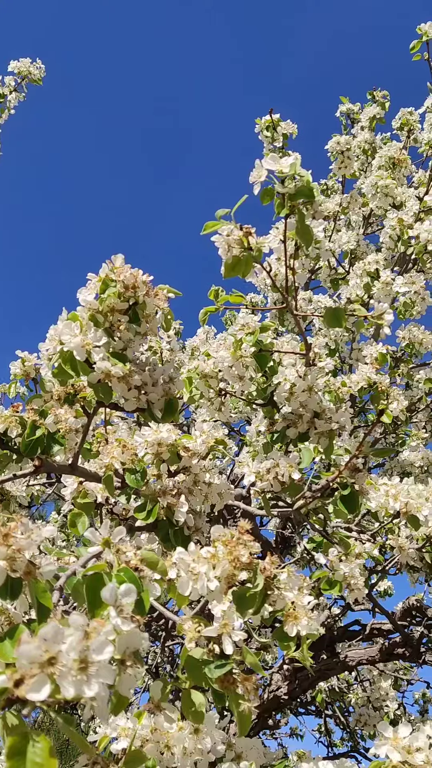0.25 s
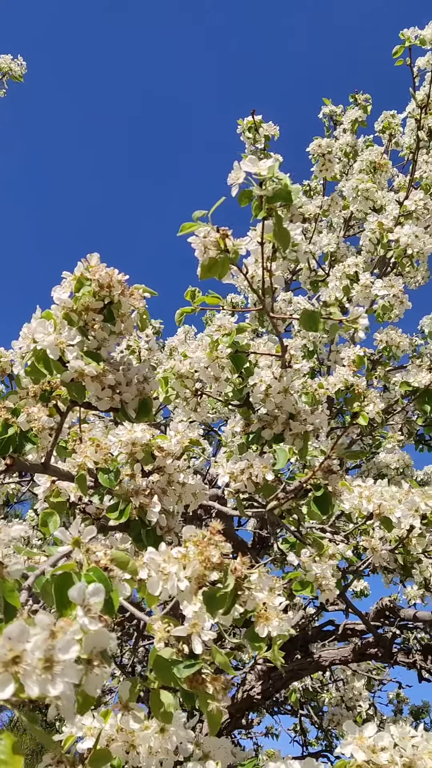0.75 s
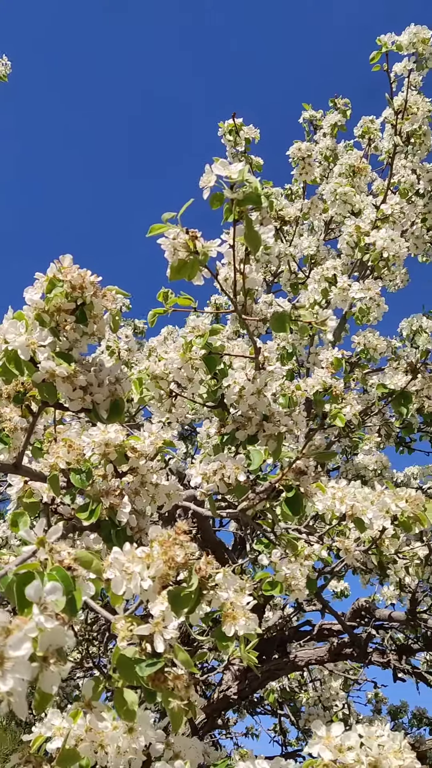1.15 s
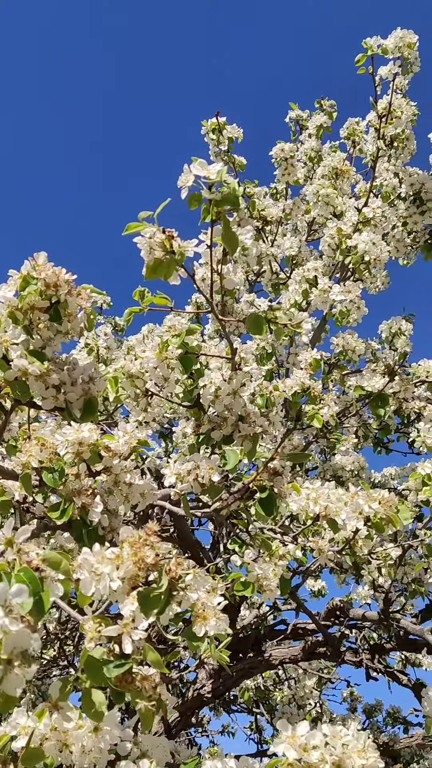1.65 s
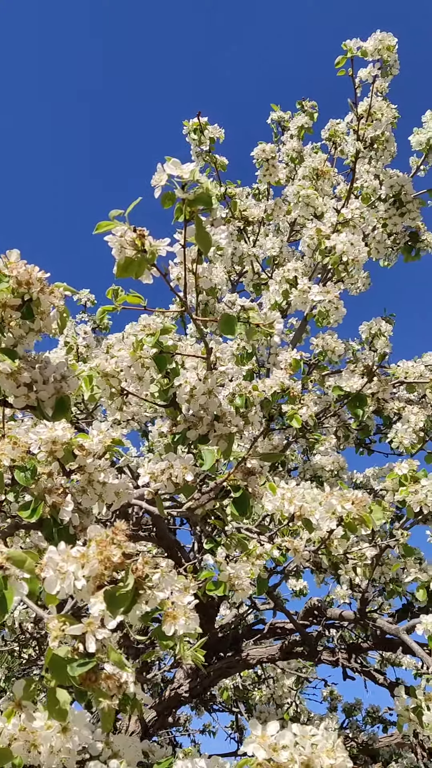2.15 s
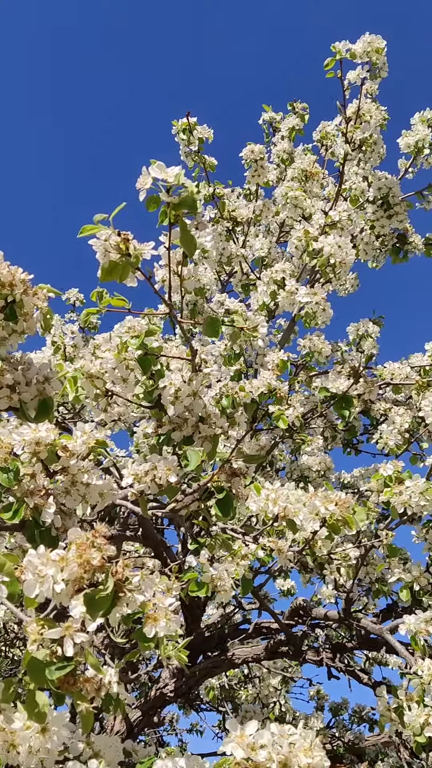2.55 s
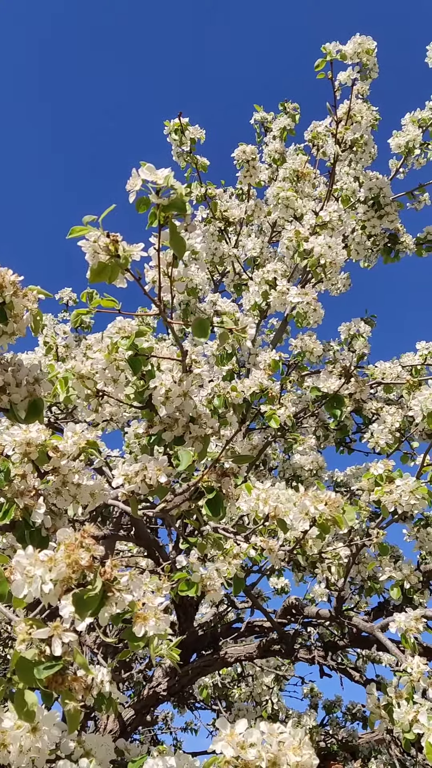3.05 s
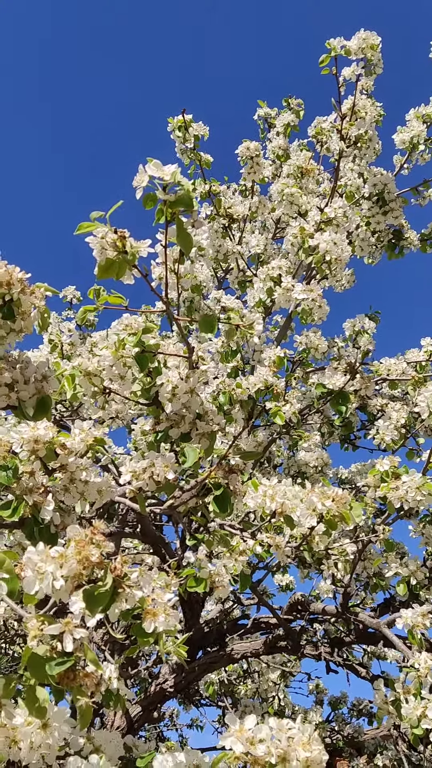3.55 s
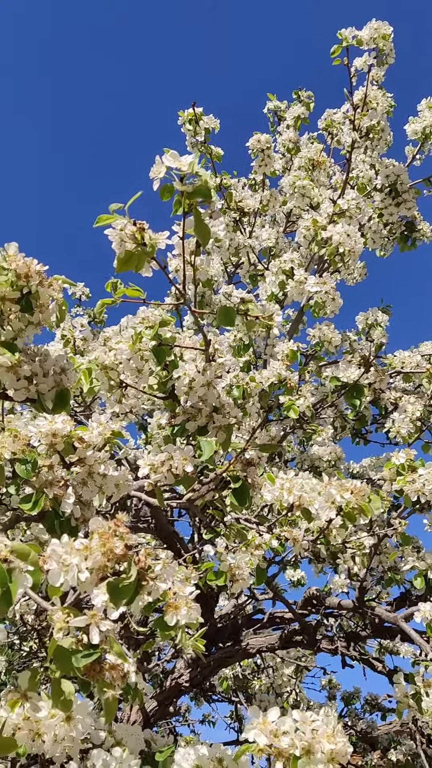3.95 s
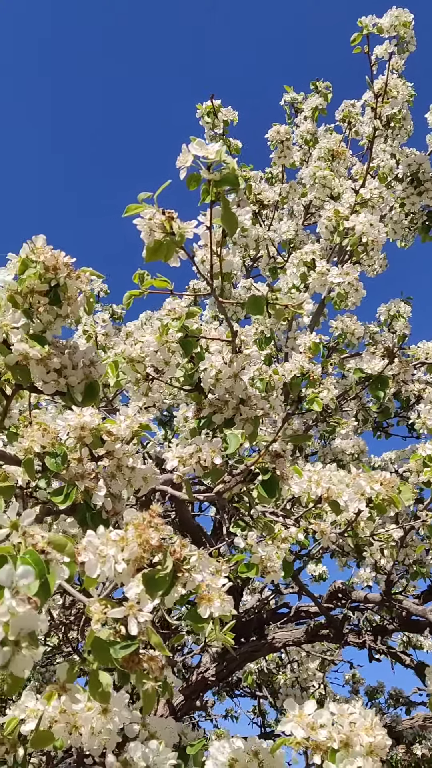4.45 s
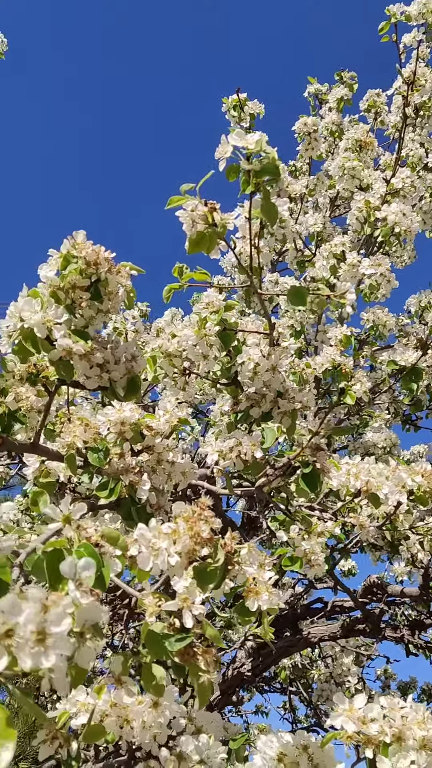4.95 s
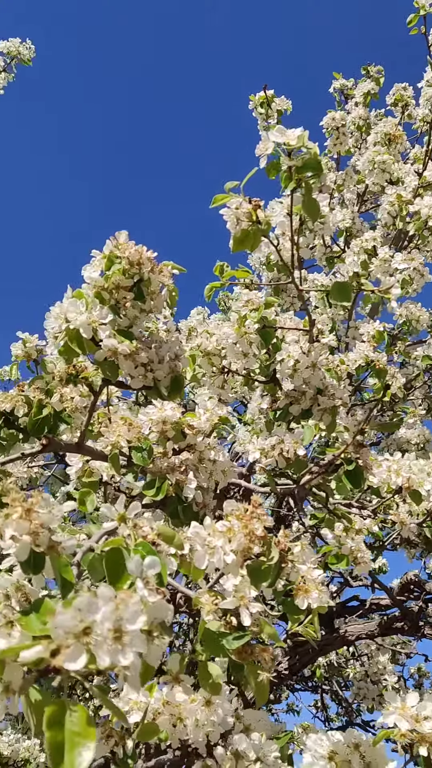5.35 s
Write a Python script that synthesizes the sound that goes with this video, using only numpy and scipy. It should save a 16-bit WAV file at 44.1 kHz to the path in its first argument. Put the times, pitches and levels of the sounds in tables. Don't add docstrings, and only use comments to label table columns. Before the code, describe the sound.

Outdoors by a flowering tree, many small birds sing at once: a loud low whistled run opens, a repeated dropping whistle follows until about two seconds, then sharp chips and falling swoops. A cockerel crows very faintly far off. Soft air, leaf rustle and low wind bumps lie beneath. Fingers tick on the handheld device. The left side is clear and strong, the right very faint and dull.

```python
import sys
import numpy as np
from scipy import signal
from scipy.fft import rfft, irfft
from scipy.io import wavfile
from scipy.ndimage import uniform_filter1d, minimum_filter1d

SR = 44100
rng = np.random.default_rng(int(sys.argv[2]) if len(sys.argv) > 2 else 0)


def decibels_to_gain(level_db):
    exponent = np.asarray(level_db, float) / 20
    return 10 ** exponent


def pcm_store(signal):
    levels = np.round(np.clip(np.atleast_2d(signal), -1, 1) * 32767)
    wavfile.write(sys.argv[1], SR, levels.astype(np.int16).T)


N = 246078


def in_time(rows):
    s, *columns = np.transpose(rows)
    return [np.interp(np.arange(N) / SR, s, column) for column in columns]


def rms_one(x):
    return x / np.sqrt(np.mean(x ** 2) + 1e-20)


def drift(rate):
    pole = np.exp(-40 * np.pi * rate / SR)
    chance = rng.standard_normal(N // 20 + 4002)
    slow = signal.lfilter([1], [1, -2 * pole, pole * pole], chance)[4000:]
    return np.interp(np.arange(N) / 20, np.arange(len(slow)), rms_one(slow))


def butter(x, hz, kind, order=2):
    return signal.sosfilt(signal.butter(order, hz, kind, fs=SR, output="sos"), x)


def coloured(spectrum, patchy_db):
    hz = np.fft.rfftfreq(N, 1 / SR) + 1
    points, level_db = np.transpose(spectrum)
    shape = decibels_to_gain(np.interp(np.log(hz), np.log(points), level_db, left=-60, right=-60))
    noise = rfft(rng.standard_normal(N)) * shape
    octave = np.log2(hz / 125)
    total = np.zeros(N)
    for k in range(8):
        band = irfft(noise * np.clip(1 - abs(octave - k), 0, 1), N)
        total += band * decibels_to_gain(patchy_db * drift(15.0))
    return rms_one(total)


def add(out, start, pitch_hz, height):
    at = round(start * SR)
    note = height * np.sin(2 * np.pi * np.cumsum(pitch_hz) / SR)
    out[at:at + len(note)] += note[:N - at]


def flutter(depth, rate):
    return 1 - np.clip(depth, 0, 1) * (1 + np.tanh(0.5 * drift(rate))) / 2


def singer(shape, times):
    out = np.zeros(N)
    s, hz, level_db = np.transpose(shape)
    waver = 1 + 0.00666 * drift(39)
    for start, stretch, ratio, peak_db in times:
        t = np.arange(0, s[-1] * stretch, 1 / SR) / stretch
        pitch = uniform_filter1d(np.interp(t, s, hz), size=100, mode="nearest")
        pitch = ratio * pitch * np.roll(waver, -round(start * SR))[:len(t)]
        add(out, start, pitch, decibels_to_gain(peak_db + np.interp(t, s, level_db)))
    return out


def bent(rows, share=0.46, bow=0.):
    rows = np.array(rows)
    middle = (rows[:, 2] + share * (rows[:, 3] - rows[:, 2])) * (1 + bow)
    return np.insert(rows, 3, middle, axis=1)


def glides(rows, edge):
    out = np.zeros(N)
    for start, length, first, middle, last, peak_db in rows:
        u = np.linspace(-edge, 1 + edge, round(length * (1 + 2 * edge) * SR))
        pitch = first * (1 - u) * (1 - 2 * u) + 4 * middle * u * (1 - u) + last * u * (2 * u - 1)
        fade = np.clip(np.minimum(u + edge, 1 + edge - u) / (2 * edge), 0, 1)
        height = decibels_to_gain(peak_db) * np.sin(fade * np.pi / 2) ** 2
        add(out, max(start - edge * length, 0), pitch, height)
    return out


def garden(x, echo_s, echo_db, scatter_db, t60, dull_hz=5600, rough=0.04):
    t = np.arange(SR // 2) / SR
    glints = rng.standard_normal(len(t)) * rng.exponential(1, len(t)) ** 1.79
    scatter = glints * decibels_to_gain(-60 * t / t60) * np.clip(t / 0.0045, 0, 1)
    wall = rough * glints * np.exp(-((t - echo_s - .001) / .003) ** 2)
    wall[round(echo_s * SR)] += 1
    reply = decibels_to_gain(scatter_db) * scatter / np.sqrt(np.sum(scatter ** 2))
    reply += decibels_to_gain(echo_db) * butter(wall, dull_hz, "low", order=3)
    reply[0] = 1
    return signal.fftconvolve(x, reply)[:N]


def gusts(calm_db, rows):
    t = np.arange(N) / SR
    power = decibels_to_gain(2 * calm_db)
    for middle_s, half_s, peak_db in rows:
        power = power + decibels_to_gain(2 * peak_db) * np.exp(-((t - middle_s) / half_s) ** 2)
    return 10 * np.log10(power)


def wind(level_db):
    lumps = decibels_to_gain(3.65 * drift(14.0))
    deep = rms_one(butter(butter(rng.standard_normal(N), 44.5, "low"), 14.6, "high"))
    edge = rms_one(butter(rng.standard_normal(N), [70, 190], "band"))
    return decibels_to_gain(level_db) * lumps * (deep + decibels_to_gain(-25.5) * lumps * edge)


# (time [s], left port level [dB], right port level [dB])
CALM_BREEZE = [(0, -50.5, -52.5), (1.6, -50.5, -50.5), (2.6, -45.5, -50.5), (5.58, -48, -43)]
# (middle time [s], half width [s], peak level [dB])
LEFT_GUSTS = [(.72, 0.023, -38), (.89, 0.028, -36), (1.19, 0.02, -41), (2.15, 0.056, -43),
              (1.98, 0.041, -35.5), (2.29, 0.025, -22), (2.62, 0.029, -31), (2.78, 0.027, -23.5),
              (2.96, 0.052, -36), (3.47, 0.078, -25.5), (3.85, 0.07, -31), (4.06, 0.048, -28.5),
              (4.3, 0.1, -30.5), (4.8, 0.061, -28), (4.98, 0.13, -26), (5.36, 0.12, -33.5)]
# (middle time [s], half width [s], peak level [dB])
RIGHT_GUSTS = [
    (2.57, 0.12, -44),
    (2.93, 0.061, -45),
    (3.5, 0.11, -39),
    (3.949, 0.11, -31.5),
    (5.35, 0.039, -40.5),
]


def wind_on_ports():
    left_calm_db, right_calm_db = in_time(CALM_BREEZE)
    return wind(gusts(left_calm_db, LEFT_GUSTS)), wind(gusts(right_calm_db, RIGHT_GUSTS))


# (frequency [Hz], level [dB per Hz])
AIR_SPECTRUM = [(120, -45), (220, -12.5), (400, -3), (700, 4), (1500, 0), (2200, 3.5), (3000, -1),
                (3800, -0.5), (4700, -12.5), (6000, -27)]


def distant_air(air_db):
    return decibels_to_gain(air_db + 10) * coloured(AIR_SPECTRUM, patchy_db=.7)


# (frequency [Hz], level [dB per Hz])
LEAF_SPECTRUM = [(5500, 2.5), (7100, -3.5), (8200, -9.5), (9500, 1.5), (11000, -7.5), (12000, -4),
                 (14200, -2.5), (15200, -9.5), (15700, -25)]


def leaf_rustle(air_db):
    level_db = -45.5 + .8 * (air_db - air_db.mean())
    return decibels_to_gain(level_db) * coloured(LEAF_SPECTRUM, patchy_db=.8)


# (frequency [Hz], level [dB per Hz])
HISS_SPECTRUM = [(150, -9.5), (500, -3), (1500, -22.5), (4000, -18), (6500, -31), (8500, -33), (14000, -30),
                 (15800, -23)]


def covered_hiss():
    return decibels_to_gain(-56.5) * coloured(HISS_SPECTRUM, patchy_db=0.8)


# (time [s], length
# [s], start pitch [Hz], end pitch [Hz], peak level [dB])
HELD_NOTES = [(0.0, 0.04, 2520, 2470, -25), (0.05, 0.06, 4260, 4140, -28.5), (0, 0.019, 5150, 4900, -51),
              (0.5, 0.027, 4180, 4100, -39), (0.5, 0.056, 6060, 5500, -36),
              (0.431, 0.11, 2274, 2218, -21.5), (.655, .015, 2600, 2750, -31), (.7, .1, 1637, 1586, -32),
              (.84, .1, 2120, 2130, -30), (.93, .08, 4440, 4660, -45), (.965, .05, 2007, 1980, -28),
              (1.035, .018, 2480, 2450, -29), (1.059, 0.04, 2320, 2250, -34),
              (1.225, .02, 4960, 5060, -35.5), (1.61, .035, 2900, 3000, -27), (2.1, .06, 2020, 1987, -46),
              (2.5, 0.048, 2740, 2600, -29), (2.18, 0.081, 2336, 1940, -28.5),
              (2.27, 0.017, 5850, 6300, -40), (2.5, 0.064, 2660, 2660, -30),
              (2.785, 0.16, 2120, 2008, -24.5), (3.431, 0.064, 2040, 1865, -25.5),
              (4, 0.06, 2200, 2180, -28.5), (3.84, .055, 2157, 2150, -27.5),
              (4.27, 0.17, 2370, 2040, -28.5), (4.5, 0.11, 1764, 1940, -32), (4.5, 0.085, 3800, 3800, -39),
              (4.39, 0.048, 4720, 4500, -42), (4.392, 0.066, 3570, 3650, -29),
              (4.7, 0.023, 2670, 2720, -26), (4.77, 0.12, 3915, 3750, -36), (4.79, .05, 4070, 4130, -38),
              (4.9, 0.12, 5080, 5150, -36), (5.011, 0.15, 1700, 1575, -29), (5.5, .12, 5070, 5100, -41),
              (5, 0.19, 2200, 2140, -34.5)]
HOOKED_NOTES = [(.262, 0.047, 3120, 2600, -18.5), (.365, .035, 4250, 3700, -33),
                (.579, 0.065, 3000, 2550, -22), (0.67, 0.038, 3290, 4300, -18),
                (1.91, 0.035, 4460, 3660, -25), (1.95, 0.04, 7440, 5740, -36),
                (2.039, 0.055, 1960, 1798, -26.5), (2.043, 0.062, 3250, 4600, -23),
                (2.05, 0.042, 3600, 5000, -31), (2.327, 0.048, 4770, 3730, -25.5),
                (2.342, 0.03, 7200, 5860, -37), (2.424, 0.022, 4000, 3660, -26),
                (2.447, 0.032, 3700, 4920, -30), (2.502, 0.013, 7000, 5550, -29),
                (2.562, 0.062, 3250, 4600, -30), (2.695, 0.12, 2540, 2040, -25),
                (2.742, 0.017, 6900, 6050, -28.5), (2.744, 0.062, 5450, 3640, -25.5),
                (2.799, 0.015, 6300, 5150, -21), (3.105, 0.012, 5050, 5470, -27),
                (3.118, .02, 6100, 5900, -33), (4.06, 0.026, 4450, 3960, -33),
                (4.865, 0.031, 6500, 5150, -32), (5.392, 0.056, 3900, 4840, -26.5)]
HIGH_SAG_NOTE = [
    (0.513, 0.1, 7200, 7250, -20),
]
DROOPING_NOTES = [
    (.706, .038, 4250, 4000, -21),
    (1.163, 0.038, 2926, 2500, -17),
    (1.336, 0.035, 2914, 2610, -18.5),
    (2.698, 0.044, 6000, 5450, -37),
]
SWEEPING_NOTES = [(.742, .08, 4000, 3546, -17.5), (1, 0.024, 2600, 3100, -29),
                  (1.308, 0.0258, 2500, 3520, -30), (1.46, 0.15, 2626, 3010, -17),
                  (1.793, .04, 3900, 4800, -25.5), (1.831, .008, 4850, 5550, -30),
                  (1.9, 0.099, 3120, 3400, -35), (1.985, 0.063, 5670, 3300, -27),
                  (2.085, 0.019, 5830, 6550, -34.5), (2.172, 0.049, 3660, 4820, -23.5),
                  (2.37, 0.026, 5400, 5800, -33), (2.39, 0.038, 5350, 4000, -27.5),
                  (2.456, .037, 7050, 6100, -28), (2.467, 0.062, 3400, 4840, -25),
                  (3.355, 0.065, 3430, 5200, -29.5), (3.558, .065, 6230, 5400, -31.5),
                  (3.623, 0.047, 4800, 4100, -32), (3.985, 0.021, 6140, 5830, -38),
                  (4.03, .03, 5620, 4960, -37), (5.003, 0.029, 4100, 5400, -26.5),
                  (5.14, 0.052, 7740, 5500, -31), (5.8, 0.039, 5550, 4000, -24),
                  (5.262, 0.022, 4320, 5000, -23), (5.529, 0.037, 7600, 5330, -26)]
ARCHED_NOTES = [
    (0.962, 0.048, 2269, 2240, -16),
    (2.326, 0.09, 1878, 1882, -25.5),
    (2.599, 0.11, 2285, 2584, -26),
    (3.682, 0.062, 2094, 2250, -22),
    (3.95, 0.049, 2010, 2080, -28.5),
    (4.47, 0.063, 2120, 2315, -27.5),
    (4.845, .12, 2147, 2130, -31.5),
    (5.171, 0.1, 2355, 2330, -28),
    (5.5, 0.045, 2250, 2060, -29),
]
SAGGING_NOTES = [
    (1.085, .052, 2250, 2444, -25),
    (1.247, 0.069, 2400, 2350, -26.5),
    (2.512, .022, 5570, 5760, -26.5),
    (2.81, 0.016, 5300, 5600, -23),
    (5.03, 0.11, 2250, 2230, -33),
]


def chorus():
    notes = np.vstack([
        bent(HELD_NOTES, bow=0.01844),
        bent(HOOKED_NOTES, share=.74),
        bent(HIGH_SAG_NOTE, bow=-0.091),
        bent(DROOPING_NOTES, share=0.25),
        bent(SWEEPING_NOTES),
        bent(ARCHED_NOTES, bow=0.0541),
        bent(SAGGING_NOTES, bow=-0.047)])
    song = glides(notes, .1) * flutter(0.67, 50)
    return decibels_to_gain(2.0) * garden(song, 0.024, -17.5, -4.0, 0.41)


# (time [s], length [s], start pitch [Hz], end pitch [Hz], peak level [dB])
DEEP_OPENING = [
    (0.016, .075, 1920, 2162, -8.5),
]
# (time [s], length [s], start pitch [Hz], end pitch [Hz], peak level [dB])
DEEP_REPLIES = [
    (0.105, 0.087, 2283, 2000, -11),
    (.19, .045, 2050, 1986, -28),
    (0.24, .075, 2330, 1883, -9),
    (0.325, 0.043, 1900, 2033, -13),
]


def deep_bird():
    notes = np.vstack([bent(DEEP_OPENING, share=1.3), bent(DEEP_REPLIES, share=.74)])
    song = garden(glides(notes, 0.13), .03, -9.5, -5.5, 0.95)
    return decibels_to_gain(1.5) * song * flutter(0.82, 71)


# (time from its start [s], pitch [Hz], level [dB])
TSEE_SHAPE = [(0, 5240, -22), (.003, 4300, -11.5), (.006, 3635, -4.5), (.018, 3720, -2), (.034, 3775, -1),
              (.052, 3765, -5.5), (.076, 3734, -6), (.09, 3610, -8.5), (.1, 3580, -25)]
# (time [s], stretch [times], pitch [ratio], peak level [dB])
TSEE_CALLS = [
    (0.082, 0.93, 1.02, -9.5),
    (0.404, 1.19, 0.99, -10.5),
    (0.732, 0.92, 0.99, -9.5),
    (1.066, 1.06, 1.01, -8.5),
    (1.43, 1.2, 0.996, -12),
    (1.767, 0.9, 0.99, -10.5),
    (2.123, 0.99, .995, -9),
]


def whistler():
    song = garden(singer(TSEE_SHAPE, TSEE_CALLS), 0.02965, -11.0, -7.5, 0.64, dull_hz=4200)
    return decibels_to_gain(3.5) * song * flutter(0.48, 65)


# (time from its start [s], pitch [Hz], level [dB])
FLAT_SHAPE = [(0, 3130, -6.5), (.012, 3135, -1.5), (.04, 3185, -0.5), (.075, 3150, -4.5), (.085, 3140, -23)]
# (time [s], stretch [times], peak level [dB])
FLAT_CALLS = [(0.12, 1, -19), (0.437, 1, -15.5), (0.754, 1, -14.5), (2.275, 0.87, -29.5),
              (2.554, 0.91, -28), (2.838, 0.63, -22.5), (3.088, 0.83, -25), (3.37, 0.61, -26.5),
              (3.628, 0.47, -23.5), (3.898, 0.57, -26.5), (4.175, 0.65, -23.5), (4.8, 0.93, -24.5),
              (5.105, 0.99, -21.5), (5.42, 1, -22)]
# (time from its start [s], pitch [Hz], level [dB])
SLUR_SHAPE = [(0, 3122, 0.5), (.015, 2950, 6.5), (.04, 2724, 3), (.095, 2610, -3), (.108, 2600, -36)]
# (time [s], stretch [times], pitch [ratio], peak level [dB])
SLUR_CALLS = [
    (2.39, 1.08, 0.99, -27.5),
    (2.668, 1.25, 0.96, -27),
    (2.928, 1.2, 0.95, -24.5),
    (3.198, 1.27, 0.95, -23.5),
    (3.473, 1.1, 0.96, -21.5),
    (3.74, 1.16, 0.94, -21.5),
    (4.007, 1.1, 0.96, -23.5),
    (4.936, 1.13, 0.97, -30),
    (5.247, 1.45, 0.92, -31),
    (5.553, 1.04, 0.99, -27),
]


def two_note_bird():
    flat_calls = np.insert(FLAT_CALLS, 2, 1, axis=1)
    notes = singer(FLAT_SHAPE, flat_calls) + singer(SLUR_SHAPE, SLUR_CALLS)
    return decibels_to_gain(1.5) * garden(notes, 0.045, -15.5, -11.0, 0.88) * flutter(0.39, 50)


# (frequency [Hz], level [dB per Hz])
FAR_WASH_SPECTRUM = [(2500, 9.5), (4200, -5), (5500, -4.5), (7100, -4.5), (7800, -16.5)]


def far_flock(count):
    when, height, curve, size, softness = rng.random((count, 5)).T
    middle = 1950 * 3.3 ** height
    bend = 1 + 0.1606 * (curve - .3)
    level_db = -8 * np.log2(middle / 2000) - 3 * softness
    start_s = when * (N / SR - .1)
    length_s = 0.012 + 0.03 * size
    rows = np.transpose([start_s, length_s, middle * bend, middle, middle / bend, level_db])
    chirps = rms_one(garden(glides(rows, .2) * flutter(.8, 50), .04, -3, 11, .3))
    return chirps + decibels_to_gain(-3) * coloured(FAR_WASH_SPECTRUM, patchy_db=3.5)


# (time [s], peak level [dB], ring pitch [Hz])
NAIL_TOUCHES = [(0.297, -15.5, 690), (0.348, -16, 706), (1.4045, -9, 1210), (1.4165, -21, 895),
                (1.575, -12.5, 704), (1.675, -16, 950), (2.748, -19, 980), (2.788, -12.5, 870),
                (3.838, -15, 696), (4.526, -9, 1030), (4.603, -16, 1080), (4.8935, -11.5, 1070)]
# (time [s], peak level [dB], ring pitch [Hz])
PAD_TOUCHES = [(0.461, -13, 875), (1.582, -14.5, 750), (1.6, -17, 910), (1.616, -13.5, 840),
               (1.643, -17, 900), (1.653, -20, 1116), (1.689, -10, 850), (1.762, -15.5, 770),
               (1.941, -25, 729), (2.832, -15.5, 815), (2.91, -7, 1190), (2.917, -11, 1180),
               (3.751, -19, 1127), (3.859, -14, 1070), (3.865, -17, 806), (3.884, -13, 1100),
               (4.045, -19.5, 1250), (4.522, -13, 1060), (4.536, -14.5, 1080), (4.549, -15, 1180),
               (4.708, -11, 960), (4.715, -17, 895), (4.772, -18, 1170), (4.88, -16, 800),
               (4.8855, -7.5, 1020), (4.891, -21, 1000), (4.8965, -2, 910), (4.903, -15, 1020)]
# (time [s], peak level [dB])
GRIT_SCRATCHES = [(1.404, -34), (1.4176, -33), (1.573, -35), (1.585, -30), (1.602, -35), (1.6127, -39),
                  (1.6334, -38), (1.6404, -45), (1.6504, -46), (1.6686, -39), (1.686, -32), (1.6944, -34),
                  (3.882, -37), (4.5251, -41.5), (4.7064, -41), (4.8823, -39)]


def finger_ticks():
    out, grit = np.zeros(N), np.zeros(N)
    t = np.arange(SR // 50) / SR
    kinds = (PAD_TOUCHES, 0.28, 0.001, 0.00092), (NAIL_TOUCHES, 2.94, 0.00017, 0.0027)
    for rows, sag, rise_s, ring_s in kinds:
        height = (1 - np.exp(-t / rise_s)) ** 2 * np.exp(-t / ring_s)
        for start, peak_db, hz in rows:
            pitch = hz * (1 + sag * np.exp(-t / 0.00069))
            add(out, start, pitch, decibels_to_gain(peak_db) * height / height.max())
    for start, peak_db in GRIT_SCRATCHES:
        at = round(start * SR)
        scratch = rng.standard_normal(len(t)) * np.exp(-t / 0.0025)
        grit[at:at + len(t)] += decibels_to_gain(peak_db + 16.0) * scratch
    touch = signal.fftconvolve(abs(out), np.exp(-t / 0.0044) / 60)[:N]
    grip = touch * rms_one(butter(rng.standard_normal(N), [330, 1100], "band"))
    port_hz = 9550
    ping = butter(grit, [.93 * port_hz, 1.0 * port_hz], "band")
    dull_scratch = butter(grit, [3000, 7000], "band")
    return out + decibels_to_gain(-14.5) * grip + ping + decibels_to_gain(-3.5) * dull_scratch


# (time [s], length [s], start pitch [Hz], end pitch [Hz], peak level [dB])
COCKEREL_NOTES = [
    (.8, .3, 800, 825, -41),
    (1.15, .24, 720, 712, -39),
    (1.745, .33, 714, 708, -38),
]


def cockerel():
    rows = bent(COCKEREL_NOTES)
    upper = rows[1:] * [1, .8, 1.6, 1.2, 3.2, 0.94] + [0, 0, 0, 0, 0, -2]
    return glides(np.vstack([rows, upper]), 0.079) * flutter(0.27, 20)


# (time from its start [s], pitch [Hz], level [dB])
EARLY_SWOOP_SHAPE = [(0, 6750, -24), (.008, 7250, -12), (.012, 7120, -52), (.016, 7030, -8),
                     (.021, 5670, -11), (.027, 5120, -13.5), (.055, 4600, -4.5), (.078, 4050, -0.5),
                     (.09, 3660, -9.5), (.11, 3380, -8), (.116, 3350, -30)]
# (time [s], stretch [times], pitch [ratio], peak level [dB])
EARLY_SWOOP_CALLS = [
    (2.571, .9, 1.04, -14),
    (2.86, 0.96, 1, -12.5),
]
# (time from its start [s], pitch [Hz], level [dB])
CHIP_SHAPE = [(0, 5450, -17), (.004, 6410, -0.5), (.008, 7490, -38), (.011, 6920, -1), (.018, 5860, 2.5),
              (.025, 5110, -4), (.034, 5070, -3), (.042, 5420, -7), (.046, 5800, -18)]
# (time [s], stretch [times], pitch [ratio], peak level [dB])
CHIP_CALLS = [
    (2.757, 1.1, 1.2, -20),
    (3.044, 0.99, 0.98, -21.5),
    (3.339, 0.75, 1.03, -20),
    (3.638, 0.97, 1.02, -20.5),
    (5.306, 0.97, 1.01, -27.5),
]
# (time from its start [s], pitch [Hz], level [dB])
SWOOP_SHAPE = [(0, 6390, -17), (.008, 7350, -9), (.012, 7080, -57), (.017, 6990, -10), (.022, 5730, -9.5),
               (.027, 5074, -14.5), (.058, 4560, -4), (.075, 3930, -1), (.104, 3396, -6), (.112, 3330, -35)]
# (time [s], stretch [times], pitch [ratio], peak level [dB])
SWOOP_CALLS = [
    (3.139, 1.12, 0.99, -12.5),
    (3.441, 1.02, 1.008, -11),
    (3.74, 0.98, 1, -12.5),
    (5.413, 1.09, 0.99, -14.5),
]


def warbler():
    notes = singer(EARLY_SWOOP_SHAPE, EARLY_SWOOP_CALLS)
    notes += singer(CHIP_SHAPE, CHIP_CALLS) + singer(SWOOP_SHAPE, SWOOP_CALLS)
    song = garden(notes, .029, -2.5, -6.0, 0.4, dull_hz=6600, rough=.01)
    return decibels_to_gain(4.5) * song * flutter(0.45, 48)


def birds():
    song = chorus() + deep_bird() + whistler() + two_note_bird() + cockerel() + warbler()
    return butter(song, 6520, "low", order=8)


def through_cover(heard):
    late = np.pad(heard, (17, 0))[:N]
    dull = decibels_to_gain(-26.5) * butter(late, 5600, "low", order=6)
    return signal.lfilter(*signal.iirnotch(3330, 12, SR), dull)


# (time [s], breeze level [dB], far flock level [dB])
BACKGROUND = [(0, -39, -86), (.25, -42.5, -30.5), (.45, -34.5, -32), (.75, -40, -37), (1.0, -39.5, -38),
              (1.45, -38.5, -35), (1.65, -37, -35.5), (1.8, -39.5, -39), (2.5, -39.5, -34.5),
              (3.9, -38.5, -33), (4.2, -40, -49), (4.8, -39, -69), (5.2, -39.5, -39), (5.58, -40, -31)]


def scene():
    air_db, flock_db = in_time(BACKGROUND)
    left_wind, right_wind = wind_on_ports()
    heard = distant_air(air_db) + leaf_rustle(air_db) + birds()
    heard += decibels_to_gain(flock_db) * far_flock(count=420) + finger_ticks()
    return np.array([heard + left_wind, through_cover(heard) + right_wind + covered_hiss()])


# (frequency [Hz], share [ratio])
HIDDEN_SHARE = [(3500, 0), (6500, .15), (8300, .7), (9300, .33), (11000, .45), (12100, .8), (13000, .33),
                (14900, .33), (15300, 1.3), (15800, 2.0)]


def thinned(x, more=0., size=1024):
    n, k = np.arange(2 * size) + .5, np.arange(size) + .5
    window = np.sin(np.pi * n / (2 * size))[:, None]
    basis = window * np.cos(np.pi / size * np.outer(n + size / 2, k)) * np.sqrt(2 / size)
    lead = 2 * size - 836
    blocks = np.pad(x, (lead, 2 * size - (lead + N) % size)).reshape(-1, size)
    lines = np.hstack([blocks[:-1], blocks[1:]]) @ basis
    power = uniform_filter1d(lines ** 2, size=90, axis=1)
    around = np.sqrt(uniform_filter1d(power, size=3, axis=0) + 1e-18)
    hz = k * SR / (2 * size)
    share = np.interp(hz, *np.transpose(HIDDEN_SHARE)) + more * (hz > HIDDEN_SHARE[0][0])
    back = np.where(abs(lines) < share * around, 0, lines) @ basis.T
    return (back[1:, :size] + back[:-1, size:]).ravel()[lead - size:][:N]


def roll_off(x):
    return signal.sosfilt(signal.butter(12, 15770, fs=SR, output="sos"), x)


def record(dry):
    left = signal.lfilter(*signal.iirnotch(12400, 9, SR), dry[0])
    ceiling = .82
    gain = minimum_filter1d(ceiling / np.maximum(abs(left), ceiling), size=441)
    left = left * uniform_filter1d(gain, size=441)
    right = thinned(dry[1], more=.55)
    return roll_off(np.array([thinned(left), right]))


dry = scene()
out = record(dry)
pcm_store(out)
```